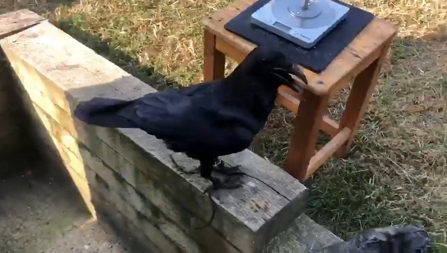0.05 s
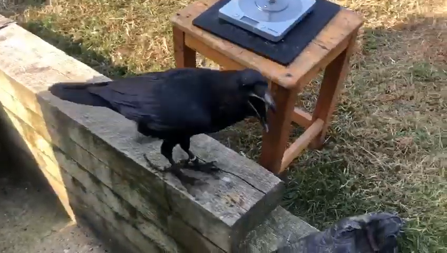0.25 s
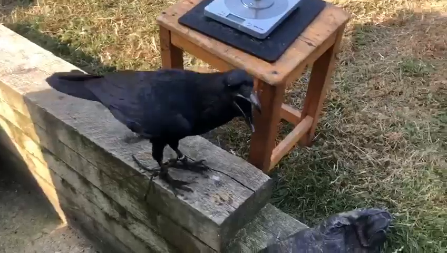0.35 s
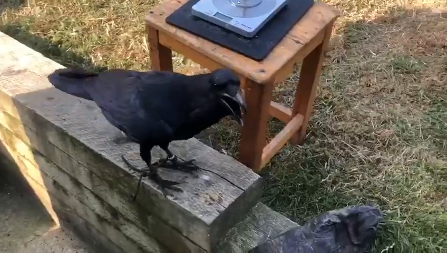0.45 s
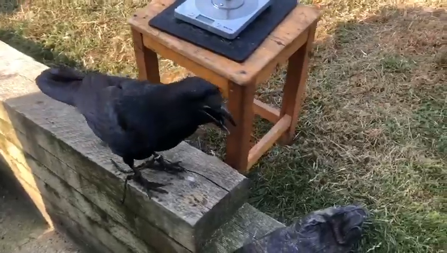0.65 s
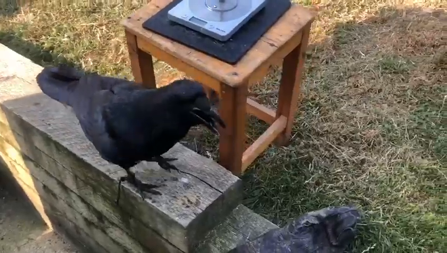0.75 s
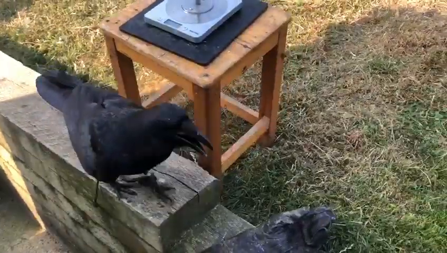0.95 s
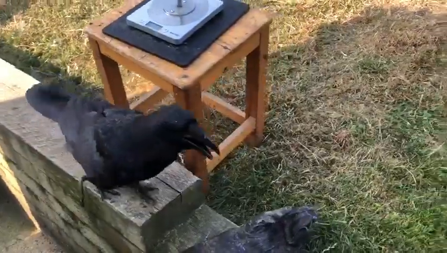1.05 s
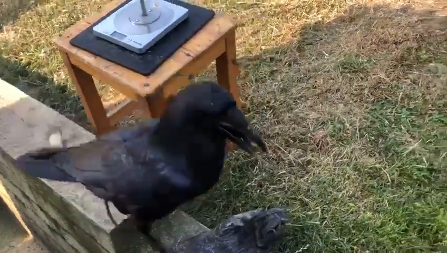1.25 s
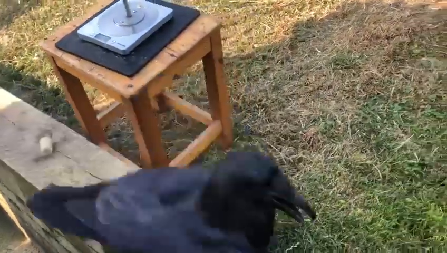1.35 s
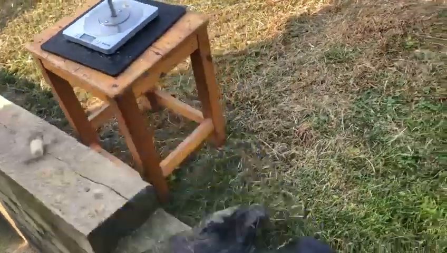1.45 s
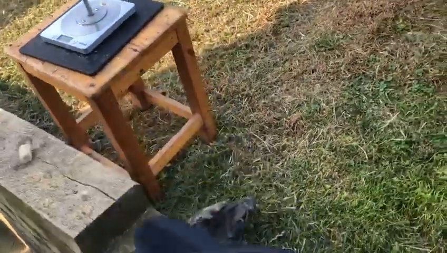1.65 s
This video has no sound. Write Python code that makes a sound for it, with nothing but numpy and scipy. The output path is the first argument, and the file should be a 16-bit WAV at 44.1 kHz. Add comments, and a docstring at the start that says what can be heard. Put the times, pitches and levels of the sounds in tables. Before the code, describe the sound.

A raven caws once, close by, from about 0.2 to 0.5 seconds, just after two faint claw scrapes on wood. The loud call rises and falls in pitch, clear in the middle and rasping at both ends. Faint claw ticks come around 1 second, a soft knock with clicks on timber near 1.5, and two sharp taps around 1.6. Quiet garden air and slight rustling lie underneath.

```python
"""Two faint claw scrapes on wood, then a raven close by gives one harsh caw from a timber wall.
Its syrinx is a harmonic source filtered by throat and beak: the pitch arches up and down with a fast
flutter, clear at the top and rasping at both ends. The bird then steps about and hops off, claws
ticking and feet exciting the damped modes of the timber. A quiet garden returns faint reflections."""
import sys
import numpy as np
from scipy import signal
from scipy.fft import rfft, irfft, next_fast_len
from scipy.io import wavfile
from scipy.ndimage import map_coordinates

SR = 44100
rng = np.random.default_rng(int(sys.argv[2]) if len(sys.argv) > 2 else 0)


def wav_out(sig):
    """Save sig, one row per channel (or a flat mono array), as 16-bit PCM at SR to the path in sys.argv[1]."""
    wavfile.write(sys.argv[1], SR, np.round(np.clip(np.atleast_2d(sig).T, -1, 1) * 32767).astype(np.int16))


N = 74970
T = np.arange(N) / SR

# Spectrum of the garden air: frequency_hz, relative_db
AIR_SPECTRUM = [(20, -11.5), (35, -6.5), (58, 6), (110, -1), (230, -2.5), (450, -6.5), (750, -6),
                (1100, -18), (1800, -17.5), (3100, -20.5), (5000, -24.5), (10500, -23), (12000, -33.5)]
# Spectrum of rustling feathers and dry grass: frequency_hz, relative_db
RUSTLE_SPECTRUM = [(200, -4), (600, 4), (2200, 5.5), (3000, -4), (4200, 3.5), (8000, -7), (10200, 0.5),
                   (12000, -12)]
# Envelope of the rustle: time_s, level_db
RUSTLE_ENVELOPE = [(0, -60), (.1, -63.5), (.17, -63.5), (.85, -69.5), (.98, -58.5), (1.1, -58),
                   (1.22, -57.5), (1.4, -57.5), (1.52, -54), (1.7, -58)]
# Reverberation time of the garden: frequency_hz, t60_s
GARDEN_DECAY = [(200, .4), (1400, 0.57), (4000, 0.55), (10000, .25)]

# Claw ticks and scrapes: start_s, level_db, low_hz, high_hz, t60_s
CLAW_TICKS = [(.027, -51, 1510, 6100, 0.15), (0.0442, -41.5, 650, 2000, 0.075),
              (.9525, -42, 690, 2495, .025), (1.037, -44, 712, 2180, 0.044),
              (1.0465, -45, 800, 5660, 0.032), (1.441, -44.5, 495, 2440, .07),
              (1.4553, -24, 2500, 10300, 0.0047), (1.4555, -30, 600, 7400, 0.045),
              (1.4708, -27.5, 940, 8200, 0.01), (1.4806, -33.5, 990, 9200, 0.024)]
# Feet landing on the timber: start_s, gain_db
FOOT_LANDINGS = [(.9535, -41.5), (1.4714, -24.5), (1.4764, -30)]
# Timber modes excited by a landing: frequency_hz, relative_db, t60_s
LANDING_MODES = [(224.5, -15.5, 0.26), (464, 6.5, 0.027), (519, 0.5, 0.068), (628.5, -3, 0.063),
                 (708, 7, 0.044), (820, 1.5, 0.031), (1093, -1, 0.052), (1338, -14.5, 0.11),
                 (2003, 7, 0.014)]
# Hard taps on the wood: start_s, gain_db, high_hz
HARD_TAPS = [(1.5787, -26, 9300), (1.5808, -29.5, 5000), (1.638, -29.5, 5000)]
# Modes excited by a tap: frequency_hz, relative_db, t60_s
HARD_TAP_MODES = [(490, -15, 0.021), (1126, -7.5, 0.011), (1660, -4, 0.0094), (1960, -8, 0.0078),
                  (2330, -2.5, 0.0049), (3300, -9, 0.0064), (4170, -7, .012)]

# Fundamental of the caw: time_s, pitch_hz
CAW_PITCH = [(.205, 468.6), (.215, 538.7), (.223, 605), (.237, 656.5), (.251, 692.2), (.29, 711.3),
             (.335, 720.2), (.37, 714.1), (.40, 697), (.44, 660.5), (.469, 590.2), (.48, 539.5),
             (.5, 421.4)]
# Vocal effort: time_s, effort_db
CAW_ENVELOPE = [(.2044, -46), (.2076, -19.5), (.2172, -13.5), (.227, -12.5), (.235, -11), (.252, -11.5),
                (.29, -8.5), (.35, -9), (.398, -9), (.436, -11.5), (.466, -14.5), (.478, -18), (.491, -26),
                (.505, -40)]
# Irregularity of the vibration, from 0 to 1: time_s, roughness
CAW_ROUGHNESS = [(.205, .7), (.226, .7), (.25, .22), (.29, .1), (.35, .08), (.385, .2), (.42, .45),
                 (.465, .65), (.485, 1)]
# Response of the throat and open beak: frequency_hz, gain_db
THROAT_RESPONSE = [(250, -39.5), (500, -9.5), (620, -10), (720, -5.5), (880, -11), (1020, -4), (1180, 7),
                   (1330, 0.2), (1450, -3.24), (1580, -7.5), (1930, -9), (2050, -20.5), (2160, -12.5),
                   (2800, -13.5), (3150, -20), (3550, -11), (4150, -11.5), (4700, -23), (5700, -22),
                   (6400, -30.5), (7200, -29.5), (9400, -32.5), (11000, -34), (12500, -51)]
# Contour of the rasp, before its gain and the effort apply: time_s, relative_db
RASP_ENVELOPE = [(.216, -22), (.226, -8), (.234, -13), (.255, -21), (.29, -29), (.35, -29), (.385, -23),
                 (.415, -18), (.455, -15), (.475, -18), (.5, -32)]
# Spectrum of air rushing through the syrinx: frequency_hz, relative_db
RASP_SPECTRUM = [(300, -36.5), (700, -19), (1200, -5.5), (1800, -16), (3200, -12.5), (4300, -4), (5300, -5),
                 (7000, -6.8), (9200, -4.5), (10100, -11), (11000, -13), (12500, -38)]


def amp(db):
    """Amplitude grows tenfold for every 20 dB."""
    return 10 ** (np.asarray(db) / 20)


def unit(x):
    """Normalisation to an rms of 1."""
    return x / np.sqrt(np.mean(x ** 2) + 1e-20)


def along(points, hz):
    """Interpolation of (frequency_hz, value) points on a logarithmic frequency axis."""
    frequencies, values = np.transpose(points)
    return np.interp(np.log(hz + 1), np.log(frequencies + 1), values)


def curve(points):
    """Linear interpolation of (time_s, value) points at every sample."""
    return np.interp(T, *np.transpose(points))


def wobble(rate_hz):
    """Smooth random modulation: a spline through rate_hz Gaussian values a second."""
    return map_coordinates(rng.standard_normal(N), [T * rate_hz], mode="wrap")


def filtered(x, response):
    """Zero-phase filtering: the spectrum is multiplied by a gain at each frequency."""
    size = next_fast_len(N + SR // 2)
    return irfft(rfft(x, size) * response(np.fft.rfftfreq(size, 1 / SR)), size)[:N]


def noise(spectrum):
    """Spectral shaping turns white noise into coloured noise of rms 1."""
    return unit(filtered(rng.standard_normal(N), lambda hz: amp(along(spectrum, hz))))


def band(x, low_hz, high_hz):
    """A causal band-pass filter with gentle slopes."""
    edges_hz = [low_hz, np.clip(high_hz, low_hz + 100, SR / 2 - 100)]
    return signal.sosfilt(signal.butter(2, edges_hz, "band", fs=SR, output="sos"), x)


def decay(start_s, t60_s):
    """Exponential damping: a jump to 1, then a fall of 60 dB every t60_s."""
    return (T >= start_s) * np.exp(-np.log(1000) * np.maximum(T - start_s, 0) / t60_s)


def crack(start_s, t60_s, low_hz, high_hz):
    """A brief contact has a broad spectrum: band noise decaying from an rms near 1."""
    envelope = decay(start_s, t60_s)
    burst = band(envelope * rng.standard_normal(N), low_hz, high_hz)
    return unit(burst) * np.sqrt(np.mean(envelope ** 2))


def ringing(start_s, modes, phase_wander_rad=0):
    """Free vibration is a sum of damped sinusoids; phase wander broadens their spectral lines."""
    out = np.zeros(N)
    for hz, level_db, t60_s in modes:
        phase = 2 * np.pi * (hz * (T - start_s) + rng.random())
        if phase_wander_rad:
            phase += phase_wander_rad * wobble(150)
        out += amp(level_db) * decay(start_s, t60_s) * np.sin(phase)
    return out


def background(air_db=-56):
    """Amplitude-modulated noise: garden air drifts slowly, feathers and dry grass rustle quickly."""
    air = amp(air_db + .7 * wobble(2.7)) * noise(AIR_SPECTRUM)
    rustle = amp(curve(RUSTLE_ENVELOPE) + 1.2 * wobble(73)) * noise(RUSTLE_SPECTRUM)
    return air + rustle


def garden_reflections(x, ground_delay_s=.011, ground_db=-19.5, wall_db=-29, tail_db=-39):
    """Reflection gives a ground echo, quick scatter from near wood and walls, and a faint tail."""
    hz, time_s, spectra = signal.stft(rng.standard_normal(N), SR, nperseg=256)
    damping = amp(-60 * time_s / along(GARDEN_DECAY, hz)[:, None])
    tail = band(signal.istft(spectra * damping, SR, nperseg=256)[1][:N], 200, 4180)
    walls = band(rng.standard_normal(N) * decay(.004, t60_s=.11), 200, 4550)
    response = amp(tail_db) * tail / np.linalg.norm(tail) + amp(wall_db) * walls / np.linalg.norm(walls)
    ground = amp(ground_db) * band(np.interp(T - ground_delay_s, T, x), 200, 5000)
    return ground + signal.fftconvolve(x, response)[:N]


def claws():
    """Impact and friction of claws on wood give dry noise bursts, each in its own band."""
    return sum(amp(level_db) * crack(start_s, t60_s, low_hz, high_hz)
               for start_s, level_db, low_hz, high_hz, t60_s in CLAW_TICKS)


def feet(attack_s=.0044, scuff_db=-9.5):
    """A soft impact excites the low modes of the timber, while friction adds a scuff."""
    out = np.zeros(N)
    for start_s, gain_db in FOOT_LANDINGS:
        ring = ringing(start_s, LANDING_MODES, phase_wander_rad=1.12)
        friction = unit(band(rng.standard_normal(N), 295, 2040))
        scuff = amp(scuff_db) * decay(start_s, t60_s=.13) * friction
        attack = 1 - np.exp(-np.maximum(T - start_s, 0) / attack_s)
        out += amp(gain_db) * attack * (ring + scuff)
    return out


def taps(click_db=-3):
    """A hard impact is brief, so it clicks and excites high, quickly damped modes of the wood."""
    out = np.zeros(N)
    for start_s, gain_db, high_hz in HARD_TAPS:
        ring = ringing(start_s, HARD_TAP_MODES)
        click = amp(click_db) * crack(start_s, t60_s=.0044, low_hz=1510, high_hz=11500)
        out += amp(gain_db) * band(ring + click, 200, high_hz)
    return out


def rasp(phase, gain_db=2.77, depth=.59):
    """Turbulent air passes the syrinx once a cycle, so its noise pulses at the fundamental."""
    pulsed_air = noise(RASP_SPECTRUM) * (1 + depth * np.cos(phase))
    return amp(curve(RASP_ENVELOPE) + gain_db) * unit(pulsed_air)


def voice(pitch_hz, phase, roughness, relative_effort_db, shimmer_db=3, dull_above_hz=3100):
    """Source and filter: throat and beak weight the harmonics, and weak effort dulls the treble."""
    tilt_db_per_octave = 3.1 * np.minimum(relative_effort_db, 0)
    out = np.zeros(N)
    for k in range(1, 25):
        hz = k * pitch_hz
        octaves_above = np.log2(np.maximum(hz / dull_above_hz, 1))
        level_db = along(THROAT_RESPONSE, hz) + tilt_db_per_octave * octaves_above
        level_db += shimmer_db * roughness * wobble(160)
        out += np.sqrt(2) * amp(level_db) * np.cos(k * phase + k * k)  # offsets spread the peaks
    return out


def caw(flutter_hz=86, flutter_db=.5, rattle_db=4.2, jitter_depth=.018):
    """Flutter modulates the syrinx in frequency and amplitude, deepening to a rattle as it roughens."""
    effort_db = curve(CAW_ENVELOPE)
    roughness = curve(CAW_ROUGHNESS)
    sounding = (T > CAW_ENVELOPE[0][0]) & (T < CAW_ENVELOPE[-1][0])
    flutter_phase = 2 * np.pi * np.cumsum(flutter_hz * (1 + .1 * roughness * wobble(40))) / SR
    pitch_swing = .0095 * (1 + 2 * roughness)
    pitch_hz = curve(CAW_PITCH) * (1 + pitch_swing * np.cos(flutter_phase))
    jitter = jitter_depth * roughness * wobble(450)
    phase = 2 * np.pi * np.cumsum(pitch_hz * (1 + jitter)) / SR
    harmonics = voice(pitch_hz, phase, roughness, effort_db - np.median(effort_db[sounding]))
    swing_db = flutter_db + rattle_db * roughness ** 3
    envelope = sounding * amp(effort_db + swing_db * np.sin(flutter_phase))
    return envelope * (harmonics + rasp(phase))


def scene():
    """Superposition of the bird's direct sound, its reflections and the background, in mono."""
    bird = caw() + claws() + feet() + taps()
    return (bird + garden_reflections(bird) + background())[None]


def record(dry):
    """Soft saturation rounds the highest peaks, and a steep low-pass limits the bandwidth."""
    cutoff_hz = 12300
    rounded = dry[0] / (1 + np.abs(dry[0]) ** 16) ** (1 / 16)
    return filtered(rounded, lambda hz: 1 / (1 + (hz / cutoff_hz) ** 80))[None]


dry = scene()
out = record(dry)
wav_out(out)
```